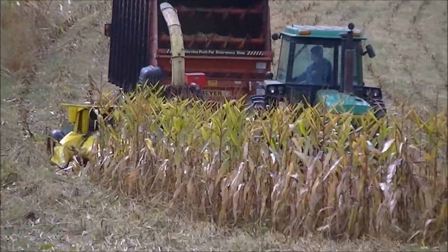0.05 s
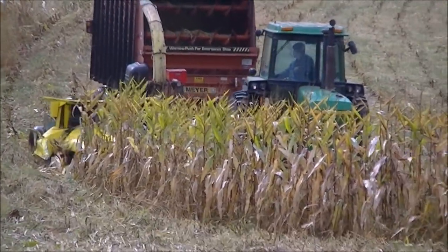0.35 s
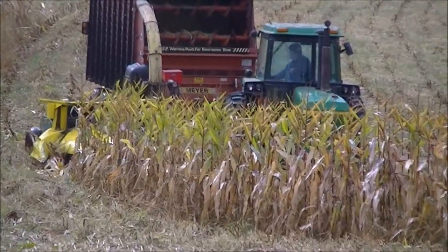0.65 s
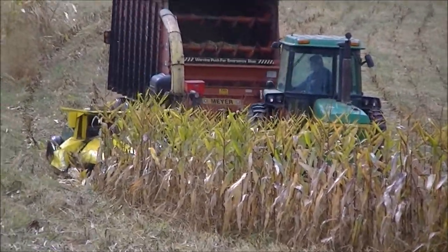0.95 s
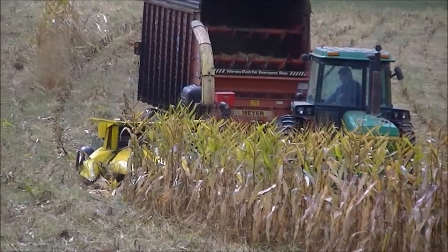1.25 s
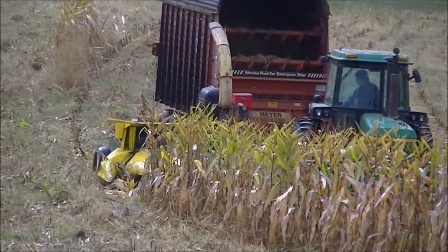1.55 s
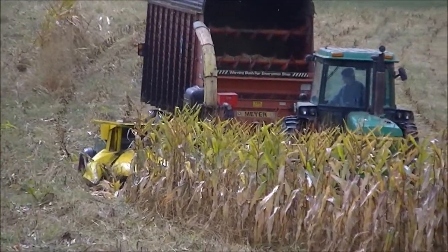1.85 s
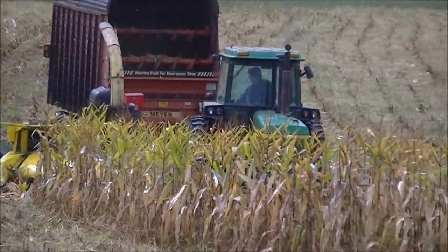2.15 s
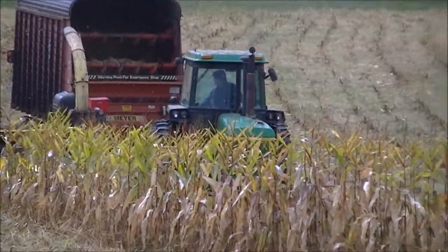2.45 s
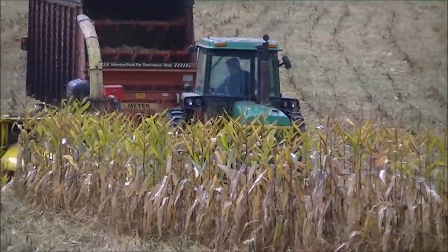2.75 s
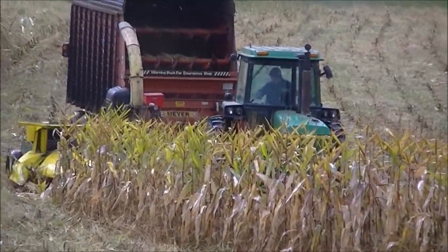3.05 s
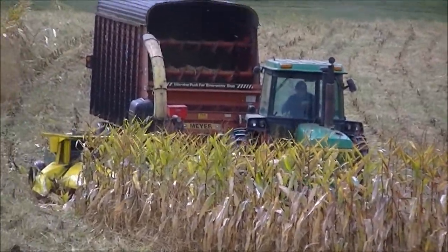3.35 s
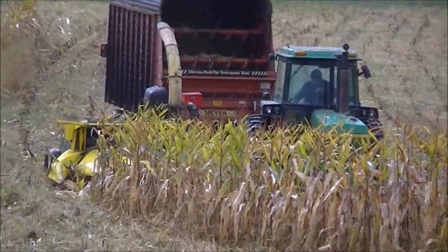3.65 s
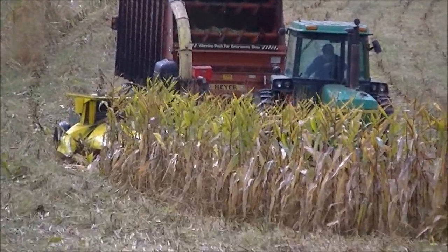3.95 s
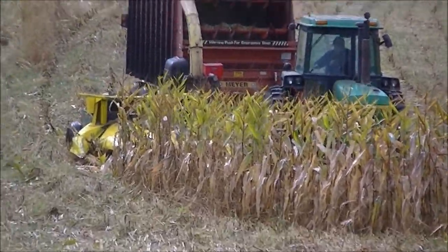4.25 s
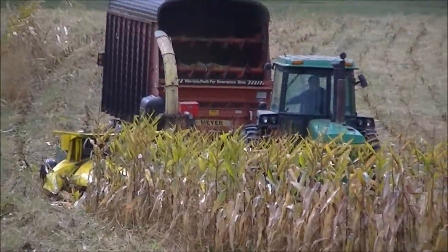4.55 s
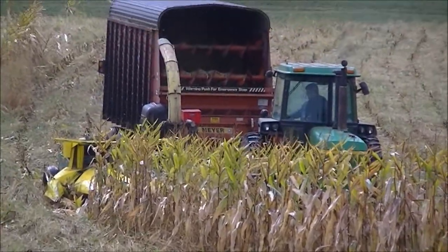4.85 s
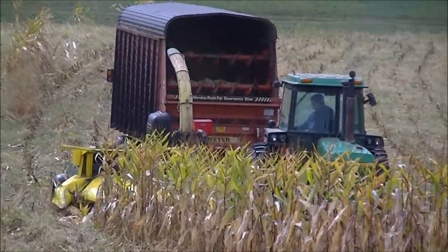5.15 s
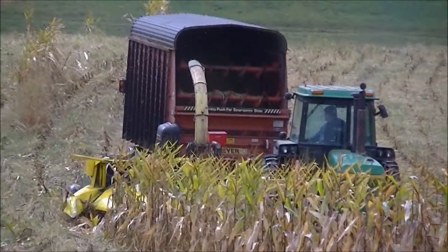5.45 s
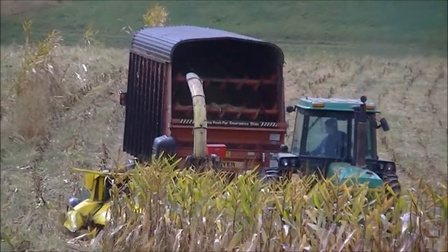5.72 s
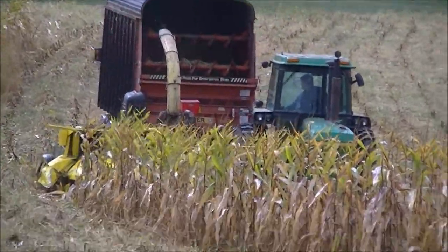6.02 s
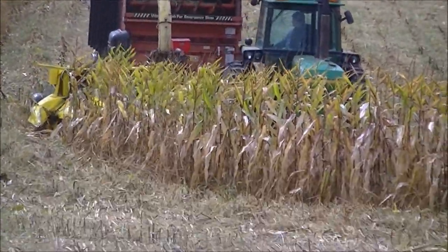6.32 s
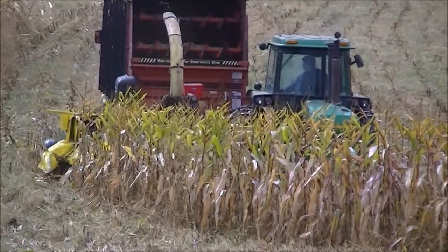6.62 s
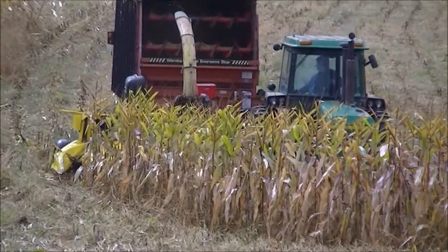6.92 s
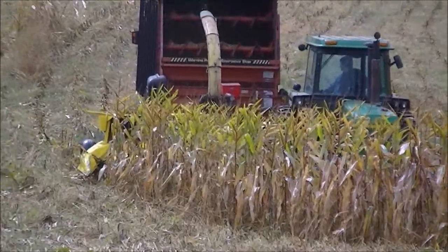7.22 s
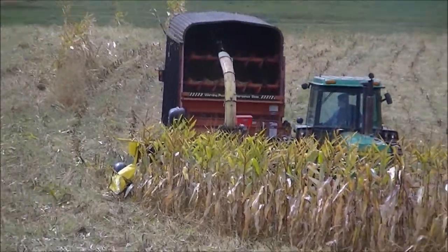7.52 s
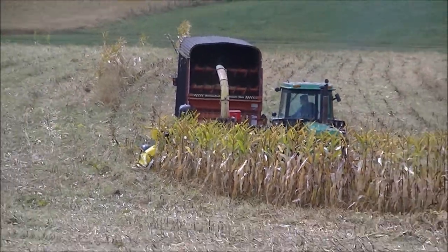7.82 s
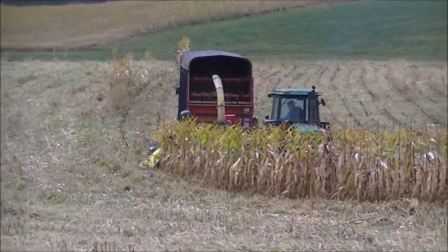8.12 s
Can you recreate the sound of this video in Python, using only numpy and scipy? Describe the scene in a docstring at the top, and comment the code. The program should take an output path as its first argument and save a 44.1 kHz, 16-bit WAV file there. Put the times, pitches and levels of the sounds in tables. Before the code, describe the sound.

Steady tractor engine clatter and the hum and hiss of a harvester chopping corn stalks, broken late by a sharp click at the microphone.

```python
"""Some way off in an open field, a six-cylinder diesel tractor pulls a forage harvester through corn.
From the start engine, fan and knife drum share one speed, and chopped stalks hiss up the spout.
A shaft scrapes once a turn, hardest in the first three seconds; just after 2 s thick bunches hit
the knives. Around 5 s the speed sags under load, and near 6.7 s come a dull knock and a stalk's crack.
At 7.1 s plastic clicks sharply right at the microphone, which takes soft bumps all the way through."""
import sys
import numpy as np
from scipy.fft import rfft, irfft, next_fast_len
from scipy.io import wavfile
from scipy.ndimage import map_coordinates

SR = 44100
rng = np.random.default_rng(int(sys.argv[2]) if len(sys.argv) > 2 else 0)


def pcm_store(signal):
    """Save signal as 16-bit PCM."""
    levels = np.round(np.clip(np.atleast_2d(signal), -1, 1) * 32767)
    wavfile.write(sys.argv[1], SR, levels.astype(np.int16).T)


N = 360738


def amp(db):
    """Decibels to gain."""
    return 10 ** (np.asarray(db) / 20)


def unit(x):
    """Scaled to rms 1."""
    return x / np.sqrt(np.mean(x ** 2) + 1e-20)


def along(points, hz):
    """(f/Hz, value) points read on a log axis."""
    freqs, values = np.transpose(points)
    return np.interp(np.log(hz + 1), np.log(freqs + 1), values)


def clock():
    """The time of every sample."""
    return np.arange(N) / SR


def curves(rows):
    """Automation lanes: one value per sample for each column after the time."""
    times, *columns = np.transpose(rows)
    return [np.interp(clock(), times, column) for column in columns]


def wobble(rate):
    """A smooth random curve, rate knots a second."""
    knots = rng.standard_normal(int(N * rate / SR) + 4)
    coarse = np.arange(0, N + 64, 64) / SR
    return np.interp(clock(), coarse, map_coordinates(knots, [coarse * rate], mode="nearest"))


def filtered(x, response):
    """EQ: x through a response given as a function of frequency."""
    size = next_fast_len(N + SR // 8, True)
    return irfft(rfft(x, size) * response(np.fft.rfftfreq(size, 1 / SR)), size)[..., :N]


# stereo image of the noise beds: (f/Hz, left-right correlation)
CORRELATION = [(40, 0.32), (85, 0.55), (160, 1), (300, 1), (550, 1), (1200, 0.97), (2300, 0.97), (4500, 1),
               (7000, 0.94), (10000, .998)]


def rush(spectrum, drive=1):
    """Stereo noise of rms 1: turbulence, pulsed by drive, rings a body with this spectrum."""
    def colour(hz):
        spread = np.arccos(np.clip(along(CORRELATION, hz), -1, .999)) / 2
        return amp(along(spectrum, hz)) * np.array([np.cos(spread), np.sin(spread)])
    mid, side = filtered(rng.standard_normal((2, N)) * drive, colour)
    return unit(np.array([mid + side, mid - side]))


def beats(turns, depth_db):
    """A gain that peaks once a turn, or dips if the depth is negative."""
    return unit(amp(depth_db * np.cos(np.pi * turns) ** 4))


def tones(orders, turns, waver_db, drift_rad):
    """Partials locked to a shaft; moving air makes each waver in level and phase."""
    out = np.zeros(N)
    for order, db in orders:
        phase = 2 * np.pi * (order * turns + rng.random()) + drift_rad * wobble(6)
        out += amp(db) * unit(amp(waver_db * wobble(4)) * np.sin(phase))
    return out


def fuzzy_line(hz, width_hz):
    """Narrow noise of rms 1 around a steady or gliding pitch."""
    fuzz = filtered(rng.standard_normal(N), lambda f: 1 / (1 + (2 * f / width_hz) ** 2) ** 0.68)
    return unit(fuzz * np.sin(2 * np.pi * np.cumsum(hz + np.zeros(N)) / SR))


def bursts(rows, rise_s, fall_s):
    """An envelope that rises, holds and dies away for each (t/s, length/s, level/dB)."""
    t, out = clock(), np.zeros(N)
    for start, length, db in rows:
        near = slice(int(start * SR), int((start + length + 10 * fall_s) * SR))
        age = t[near] - start
        out[near] += amp(db) * (1 - np.exp(-age / rise_s)) * np.exp(-np.maximum(age - length, 0) / fall_s)
    return out


# tone of the air, a dull bump and a hard bump: (f/Hz, relative level/dB)
AIR_EQ = [(10, -80), (30, -34), (60, -21), (110, 1), (170, -5), (300, 1.5), (500, -7), (2000, -60)]
DULL_EQ = [(10, -75), (35, -38), (70, -10), (140, 4), (220, -1), (400, -7), (1500, -70)]
HARD_EQ = [(60, -30), (150, -4), (220, 0), (400, 0), (600, -10), (1500, -50)]
# bump cues: (t/s, length/s, level/dB, hardness 0-1)
BUMPS = [(.074, 0.012, -47.5, 0), (1.04, 0.02, -62, 0), (1.59, .015, -59, 0), (3.1, .1, -65, 0),
         (3.272, .008, -47, 1), (3.33, .015, -55, 0), (3.56, 0.04, -58, 0), (3.645, 0.06, -56, .3),
         (6.603, 0.02, -51, .4), (6.69, .025, -59, 0), (7.345, 0.03, -52.5, .6), (7.48, .02, -58, 0),
         (8.08, 0.026, -60, 0)]


def breeze_and_bumps():
    """Light air and bumps, dull or hard, reach each microphone port differently, the left more."""
    def ports(spectrum):
        return unit(filtered(rng.standard_normal((2, N)), lambda hz: amp(along(spectrum, hz))))
    air = amp(-78.5 + 1.3 * wobble(2.8)) * ports(AIR_EQ)
    thuds = sum((1 - hard) * bursts([cue], rise_s=0.0036, fall_s=0.017) for *cue, hard in BUMPS)
    taps = sum(hard * bursts([cue], rise_s=0.0025, fall_s=0.01) for *cue, hard in BUMPS)
    return (air + thuds * ports(DULL_EQ) + taps * ports(HARD_EQ)) * amp([[2.5], [-2.5]])


# modes of the plastic, before its body EQ: (f/Hz, level/dB, t60/s)
PLASTIC_MODES = [(805, -35, 0.0092), (1910, -15, 0.0013), (2940, -4, .0025), (6230, -10.5, 0.0021),
                 (7800, -36, 0.003), (10700, -21, 0.003)]
# tone of its rattle: (f/Hz, relative level/dB)
RATTLE_EQ = [(100, -53), (400, -11), (800, 8), (1400, 3), (2900, 6), (3500, 0), (4000, -2), (6000, -4),
             (11000, -11), (16000, -34)]


def click(at_s=7.1071, lead_s=.0005, rattle_t60_s=0.018):
    """Plastic gives a little, then snaps right at the microphone, with a short rattle and little bass."""
    t = np.arange(SR // 16) / SR
    ring = -sum(amp(db - 60 * t / t60) * np.sin(2 * np.pi * hz * t) for hz, db, t60 in PLASTIC_MODES)
    snap = np.zeros(N)
    for start, db in [(at_s - lead_s, -28), (at_s, 0)]:
        snap[round(start * SR):][:len(t)] += amp(db) * ring
    age = np.clip(clock() - at_s, 0, 1)
    rattle = (age > 0) * amp(-20.5 - 60 * age / rattle_t60_s) * rush(RATTLE_EQ)
    small_body = lambda hz: (1j * hz / (1j * hz + 350)) ** 3 / (1 + (hz / 13500) ** 12)
    return filtered(snap + rattle, small_body) * amp([[-.7], [.7]])


# pitch and fader ride of the whistle: (t/s, f/Hz, level/dB)
TURBO_RIDE = [(0, 11300, -95), (1.1, 12000, -90), (1.9, 11300, -83), (3, 10900, -89), (4.3, 10750, -79.5),
              (4.9, 11100, -85), (5.9, 12150, -80.5), (6.6, 12050, -85), (7.3, 11400, -85),
              (8.18, 11100, -78.5)]


def turbo():
    """The turbocharger's faint, breathy whistle glides and comes and goes."""
    hz, db = curves(TURBO_RIDE)
    return amp(db + 2 * wobble(4.6)) * fuzzy_line(hz, width_hz=450)


# resonances of the injection gear: (f/Hz, width/Hz, relative level/dB)
INJECTION_MODES = [(6700, 200, -5), (6910, 130, 0), (7750, 420, -1)]
# their fader ride: (t/s, level/dB)
INJECTION_RIDE = [(0, -64), (1.6, -65), (3.5, -67.5), (6, -68), (8.18, -65.5)]


def injection(cycles):
    """The fuel injection chinks high and thin, once each engine cycle and never twice alike."""
    ring = sum(amp(db + wobble(17)) * fuzzy_line(hz, width) for hz, width, db in INJECTION_MODES)
    loose_cycles = cycles + .07 * wobble(17)
    return amp(curves(INJECTION_RIDE)[0]) * unit(ring * beats(loose_cycles, depth_db=4.5))


# partials of the hum: (multiple of the blade rate, level/dB)
FAN_PARTIALS = [(1, -60.7), (2, -62)]
# trim on both: (t/s, gain/dB)
FAN_TRIM = [(0, -4), (.8, -2.5), (2.3, 0), (5.4, -3), (6, -1), (7, 0.5), (8.18, -1.5)]


def fan(blade_passes):
    """The fan's blades chop the air into a low hum."""
    return amp(curves(FAN_TRIM)[0]) * tones(FAN_PARTIALS, blade_passes, waver_db=1.5, drift_rad=0.052)


# tone of the exhaust and the diesel clatter: (f/Hz, relative level/dB)
EXHAUST_EQ = [(15, -80), (54, -42), (96, -18), (125, -13), (175, -12.5), (215, -1), (236, 1.5), (258, -8),
              (288, -1.5), (317, -1.5), (328, -12), (440, -10), (570, -29), (970, -120)]
CLATTER_EQ = [(540, -37.5), (920, -14), (985, -10.5), (1040, -8), (1140, -3), (1240, -2.5), (1290, -1.5),
              (1370, -5), (1450, -5), (1610, -9.5), (1780, -7), (2150, -18), (2800, -25.5), (4730, -120)]
# fader ride of the clatter: (t/s, level/dB)
CLATTER_RIDE = [(0, -40.5), (.8, -40.5), (1.45, -41.5), (1.7, -43), (2.1, -44), (2.8, -38.7), (3.3, -39.5),
                (3.6, -37.5), (3.9, -36.3), (4.05, -38), (4.25, -38), (4.33, -40), (4.6, -39.5),
                (4.8, -40.3), (5.15, -41.5), (5.45, -39), (5.7, -41), (6.15, -40.5), (6.68, -42),
                (7.0, -39.7), (7.55, -39.3), (7.8, -40.5), (8.18, -42.5)]
# engine drone, and the block's buzz at average clatter: (multiple of the cycle rate, level/dB)
DRONE_PARTIALS = [(6, -81.1), (12, -68), (35, -64.8), (36, -64.6), (38, -60.7), (45, -65.1), (46, -63.7)]
BUZZ_PARTIALS = [(60, -61), (65, -60), (66, -55), (67, -57), (68, -56), (69, -53), (70, -52), (71, -54),
                 (72, -54), (73, -56), (74, -53.5), (76, -57), (78, -57), (86, -60)]
# swells of engine whine: (t/s, length/s, level/dB, multiple of the cycle rate)
WHINES = [(.7, 0.3, -45, 66), (3.54, .08, -43, 69), (4.42, .07, -42, 68), (4.59, .05, -43.5, 69),
          (4.95, .1, -45, 75), (5.23, .06, -43, 69), (5.4, .08, -45, 60), (6.0, .22, -44, 75),
          (6.77, 0.12, -44.5, 66), (6.95, .55, -48, 75)]


def diesel(cycles, cylinders=6):
    """Each firing puffs from the exhaust and rattles the block; the four-stroke cycle sets the drone."""
    firings = cylinders * cycles
    clatter_db, = curves(CLATTER_RIDE)
    exhaust = amp(-62 + 0.34 * wobble(3.43)) * rush(EXHAUST_EQ, beats(firings, depth_db=1))
    rattle = beats(firings, depth_db=2) * beats(cycles, depth_db=-0.5)
    clatter = amp(clatter_db + 0.55 * wobble(9)) * rush(CLATTER_EQ, rattle)
    drone = tones(DRONE_PARTIALS, cycles, waver_db=1, drift_rad=0.45)
    buzz = unit(amp(clatter_db)) * tones(BUZZ_PARTIALS, cycles, waver_db=2, drift_rad=0.44)
    whine = np.zeros(N)
    for *cue, order in WHINES:
        swell = bursts([cue], rise_s=0.011, fall_s=0.06)
        whine += swell * tones([(order, 0)], cycles, waver_db=1.5, drift_rad=0.35)
    return exhaust + clatter + drone + buzz + whine


# tone of the scraping steel: (f/Hz, relative level/dB)
SCRAPE_EQ = [(1000, -51), (3900, -0.5), (4600, 4.5), (5050, -2), (5500, -7.5), (8500, -20), (9800, -16.5),
             (11000, -28), (16000, -70)]
# its fader ride at the usual crop flow: (t/s, level/dB)
SCRAPE_RIDE = [(0, -55), (.65, -50), (.85, -53), (1.25, -50.5), (1.5, -48.5), (1.8, -52), (2.1, -48.5),
               (2.7, -48.8), (3.2, -49.8), (3.5, -54), (4.5, -56), (8.18, -56)]


def scrapes(shaft_turns, flow_db, contact_at_s=2.164, half_length_s=.006):
    """Steel brushes steel each time the shaft comes round, harder when more crop goes through."""
    turns = shaft_turns - np.interp(contact_at_s, clock(), shaft_turns)
    nearest_turn = np.round(turns).astype(int)
    from_contact_s = (turns - nearest_turn) / (np.gradient(shaft_turns) * SR)
    scatter_db = 1.6 * rng.standard_normal(256)[nearest_turn]
    pressure = amp(curves(SCRAPE_RIDE)[0] + .5 * flow_db + scatter_db)
    return pressure * np.exp(-(from_contact_s / half_length_s) ** 2) * rush(SCRAPE_EQ)


# cues where the shaft catches hard: (t/s, level/dB)
CATCHES = [(.578, -58), (.653, -56), (.729, -53), (.805, -54), (.881, -54), (1.033, -58), (1.485, -55),
           (1.563, -57), (1.937, -56), (2.089, -54), (2.163, -52), (2.337, -51), (2.45, -48), (2.54, -52),
           (2.615, -55), (2.765, -52.5), (2.99, -57), (3.893, -57), (4.044, -56), (4.948, -57)]
# tone of the ping: (f/Hz, relative level/dB)
PING_EQ = [(3000, -38), (4600, 5.5), (5100, 0), (5600, -3), (6500, -13), (8800, -12), (9600, -2),
           (10000, -9), (10400, -6), (11000, -19), (16000, -50)]


def pings(half_length_s=.006):
    """A hard contact of the shaft adds a short, bright ping."""
    t = clock()
    hits = sum(amp(db) * np.exp(-np.minimum(((t - at) / half_length_s) ** 2, 50)) for at, db in CATCHES)
    return hits * rush(PING_EQ)


# cues for thick bunches, the crack and the knock: (t/s, length/s, level/dB)
BUNCHES = [(2.15, 0.038, -42.5), (2.271, 0.072, -31), (2.348, 0.065, -36), (2.44, 0.036, -33),
           (3.98, 0.05, -40.5), (5.42, 0.07, -41), (6.16, 0.04, -40.5)]
CRACKS = [(6.779, 0.0015, -27.5)]
KNOCKS = [(6.584, .004, -31)]
# tone of the shredding and the crack: (f/Hz, relative level/dB)
SHRED_EQ = [(120, -53), (250, -37), (550, -6), (900, -3), (1200, 8), (1550, -2), (1800, 4), (2060, -12),
            (2250, -4), (2700, -8), (3400, -4), (3850, -13), (4500, -10), (5300, -16), (5650, -12),
            (7200, -27), (8000, -19), (12000, -45), (16000, -68.5)]
CRACK_EQ = [(200, -72), (1000, -24), (2000, 1), (2750, -7), (3200, 4), (3800, -9.5), (6000, -25),
            (10000, -35), (16000, -80)]


def crop_hits():
    """The knives shred bunches of stalks in gritty bursts; the machine knocks once and a stalk cracks."""
    grit = amp(1.9 * wobble(600))
    shredding = bursts(BUNCHES, rise_s=0.01, fall_s=0.016) * rush(SHRED_EQ, grit)
    crack = bursts(CRACKS, rise_s=0.0004, fall_s=0.003) * rush(CRACK_EQ)
    knock = bursts(KNOCKS, rise_s=0.001, fall_s=0.004) * rush(CLATTER_EQ)
    return shredding + crack + knock


# tone of the chopping and the spout's hiss: (f/Hz, relative level/dB)
CHOP_EQ = [(1210, -33), (2050, -1), (2150, -7.5), (2420, 0), (2630, -3.5), (2950, 1), (3450, -2.5),
           (3800, -11), (5070, -47), (8580, -120)]
SPOUT_EQ = [(2180, -28), (3600, -5), (3900, -5.5), (4380, -2), (5000, -5), (6300, -9.5), (7200, -13.5),
            (7900, -14.5), (8720, -18), (9800, -20), (12300, -35), (15500, -52)]
# resonances of the spout's sheet steel: (f/Hz, width/Hz, relative level/dB)
PANEL_MODES = [(2190, 45, -4), (2335, 70, 0), (2853, 35, -2), (3080, 90, -3), (3375, 75, 0),
               (4156, 30, -10), (4420, 150, -4), (4950, 70, -10)]


def chopped_stalks(knife_passes, shaft_turns, flow_db):
    """Stalks are cut, hiss up the spout in spurts and pelt its panels, each ringing at its own pitch."""
    spurts = amp(0.43 * wobble(25))
    grains = unit(amp(1.1 * wobble(500)))
    cuts = beats(knife_passes / 2, depth_db=-2)
    chop = amp(-50 + 0.39 * flow_db) * rush(CHOP_EQ, spurts * grains * cuts)
    hiss = amp(-54.5 + flow_db) * rush(SPOUT_EQ, spurts * grains)
    pelting = grains * beats(3 * shaft_turns, depth_db=3)
    panels = sum(amp(db + 2.4 * wobble(14)) * fuzzy_line(hz, width) for hz, width, db in PANEL_MODES)
    ring = amp(-54.5 + .35 * flow_db) * unit(pelting * panels)
    return chop + hiss + ring


# tone of the roar: (f/Hz, relative level/dB)
BLOWER_EQ = [(250, -55), (420, -49), (445, -25.5), (480, -8.5), (584, -4), (645, 0.5), (721, -5), (887, -7),
             (933, -6), (985, -5.5), (1050, -6), (1300, -24), (2200, -120)]
# its fader ride: (t/s, level/dB)
BLOWER_RIDE = [(0, -43.5), (1.2, -45), (2.1, -47.5), (2.9, -44), (4.2, -44), (4.6, -42), (4.95, -41.5),
               (5.15, -44), (5.36, -42), (5.6, -44), (8.18, -43.5)]


def blower(knife_passes):
    """Turbulent air roars in the blower, pulsing slightly with each knife."""
    level_db = curves(BLOWER_RIDE)[0] + 0.35 * wobble(12)
    return amp(level_db) * rush(BLOWER_EQ, beats(knife_passes, depth_db=0.5))


# partials of the drum: (multiple of the knife rate, level/dB)
DRUM_PARTIALS = [(1, -78.5), (2, -54.5), (2.5, -60.5), (3.5, -56), (4, -51), (4.5, -58.5), (5.5, -55),
                 (6, -60.5)]
# fader ride of its clearest note: (t/s, level/dB)
SING_RIDE = [(0, -48), (.7, -50), (1.8, -52), (3.2, -51.5), (4.4, -49.7), (5.0, -49.3), (5.16, -64),
             (5.38, -51), (5.65, -58), (5.85, -50.5), (6.5, -52.5), (7.2, -50), (8.18, -50)]


def knife_drum(knife_passes):
    """The passing knives make a pitched hum, whose third harmonic sings out."""
    hum = tones(DRUM_PARTIALS, knife_passes, waver_db=0.5, drift_rad=0.47)
    note = tones([(3, 0)], knife_passes, waver_db=0.5, drift_rad=0.13)
    return hum + amp(curves(SING_RIDE)[0]) * note


# knife passes a second, sagging twice under load: (t/s, f/Hz)
KNIFE_RATE = [(0, 311), (.25, 313.5), (.45, 312), (.75, 316.7), (1.5, 318.8), (3, 318.8), (4.4, 319.8),
              (4.8, 317.8), (5.0, 314), (5.12, 310), (5.3, 315.5), (5.6, 313.6), (5.8, 315.3), (6.5, 314.5),
              (6.9, 318.9), (8.18, 320)]
# crop flow through the harvester: (t/s, level/dB about the usual flow)
CROP_FLOW = [(0, 3.5), (.2, 4.8), (.32, 6.6), (.45, 4.8), (.65, 2.5), (1, -4), (1.85, -4), (2.25, 1),
             (2.8, 2.5), (3.2, -.7), (3.7, -1), (4.6, 0.3), (4.95, 1.8), (5.6, 0.7), (6.15, 0.8), (6.5, -1),
             (7.3, -.7), (7.85, -2), (8.18, -5)]


def scene():
    """The mix: one speed drives tractor and harvester, which sit slightly left of centre."""
    knife_hz, = curves(KNIFE_RATE)
    flow_db, = curves(CROP_FLOW)
    knife_passes = np.cumsum(knife_hz) / SR
    shaft_turns = knife_passes / 24  # knives on the drum
    cycles = knife_passes * 16.845 / 316.67  # gearing: engine cycle Hz / knife Hz
    blade_passes = knife_passes * 243 / 316.67  # fan blade Hz / knife Hz
    tractor = diesel(cycles) + fan(blade_passes) + injection(cycles) + turbo()
    harvester = knife_drum(knife_passes) + blower(knife_passes)
    harvester = harvester + chopped_stalks(knife_passes, shaft_turns, flow_db) + crop_hits()
    shaft = scrapes(shaft_turns, flow_db) + pings()
    return (tractor + harvester + shaft) * amp([[.25], [-.25]]) + breeze_and_bumps() + click()


def record(dry, low_cut_hz=52, top_hz=15500):
    """The microphone chain adds faint treble hiss, drops the deepest bass and cuts the top steeply."""
    hiss_band = lambda hz: np.exp(-((hz - 11000) / 6000) ** 2)
    hiss = amp(-75.5) * unit(filtered(rng.standard_normal(N), hiss_band))
    low_cut = lambda hz: hz ** 2 / np.hypot(hz ** 2, low_cut_hz ** 2)
    return filtered(dry + hiss, lambda hz: low_cut(hz) / (1 + (hz / top_hz) ** 120))


dry = scene()
out = record(dry)
pcm_store(out)
```